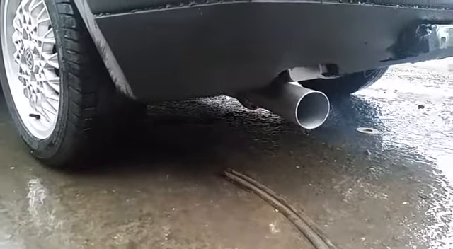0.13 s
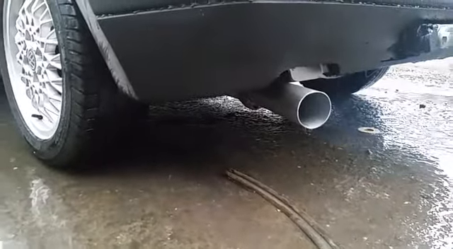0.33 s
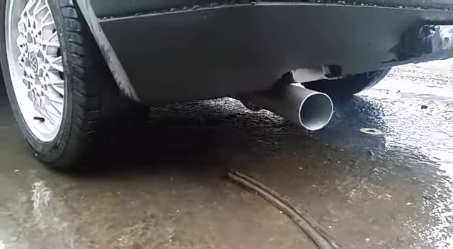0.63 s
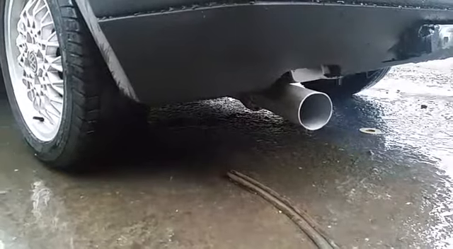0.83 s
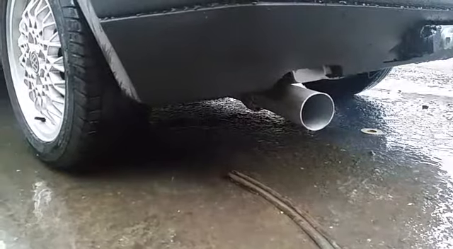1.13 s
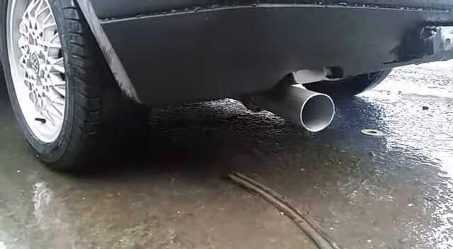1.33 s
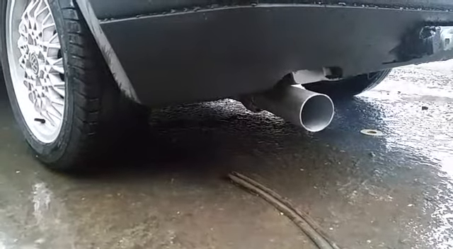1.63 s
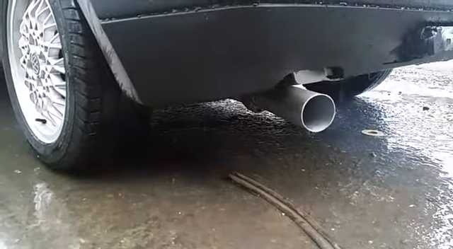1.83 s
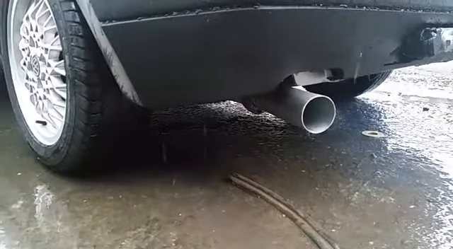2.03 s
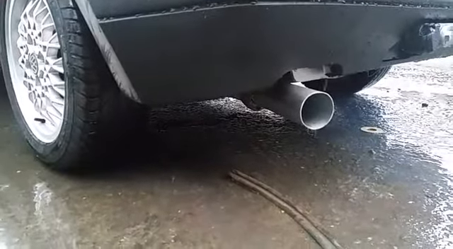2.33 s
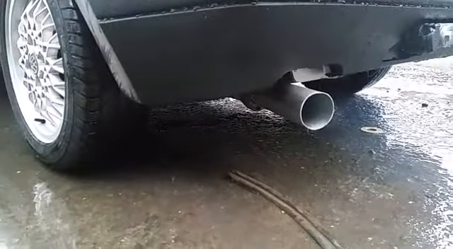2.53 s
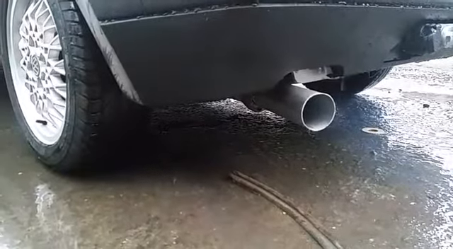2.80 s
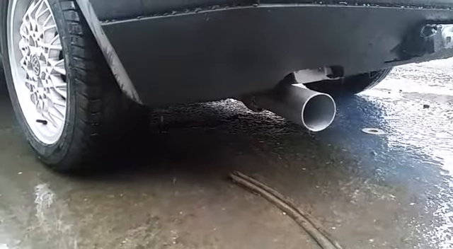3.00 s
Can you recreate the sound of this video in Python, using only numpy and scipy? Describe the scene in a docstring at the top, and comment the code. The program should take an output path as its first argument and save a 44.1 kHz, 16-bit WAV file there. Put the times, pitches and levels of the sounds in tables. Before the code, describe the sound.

A diesel engine at the tailpipe drops to idle, then revs up with growing boom and whistle

```python
"""Four-cylinder turbo diesel at the tailpipe

Heard close up, the engine falls back from a blip, idles, then revs up steadily; a tiny tick falls in the climb.
Each firing booms through the silencer (a sum of harmonics) and pushes out a puff of hissing gas (shaped noise).
The turbo's breathy whistle (a wavering tone and narrow noise) climbs with the revs and flares where it
meets a resonance of the pipe."""
import sys
import numpy as np
from scipy import signal
from scipy.fft import rfft, irfft
from scipy.io import wavfile

SR = 44100
rng = np.random.default_rng(int(sys.argv[2]) if len(sys.argv) > 2 else 0)


def store_pcm(level_fs):
    """Save levels as 16-bit WAV."""
    pcm = np.round(np.clip(level_fs, -1, 1) * 32767).astype(np.int16)
    wavfile.write(sys.argv[1], SR, np.atleast_2d(pcm).T)


N = 139356  # length in samples
TIME = np.arange(N) / SR  # s
BINS = np.arange(N // 2 + 1) * SR / N  # Hz, the frequencies of a whole-length spectrum


def undb(db):
    """Turn decibels into a plain multiplier."""
    return 10 ** (np.asarray(db) / 20)


def curve(table, axis=1):
    """One column of a time table, sample by sample."""
    rows = np.array(table)
    return np.interp(TIME, rows[:, 0], rows[:, axis])


def response(table, hz, axis=1):
    """Gain of a spectrum table at these frequencies, read along a logarithmic pitch scale."""
    rows = np.array(table)
    return undb(np.interp(np.log(np.maximum(hz, 1)), np.log(rows[:, 0]), rows[:, axis]))


def below(hz, edge_hz):
    """Share of a smooth crossover that lies under its edge."""
    return 1 / (1 + (hz / edge_hz) ** 6)


def walk(rate):
    """Smooth chance of spread 1, about this many turns a second."""
    x = irfft(rfft(rng.standard_normal(N)) * np.exp(-.5 * (BINS / rate) ** 2), N)
    return x / x.std()


def boom(hz, firings):
    """Firing pulses as harmonics shaped by the silencer; unequal cylinders add weak lines between them."""
    # how hard the exhaust works: t/s, firing fundamental/dB, relative boom/dB, relative growl/dB
    effort = [(0,-11.5,-1,-5.5),(.12,-19,1.5,-4.5),(.22,-13.5,-1.5,0.5),(.4,-22,-3,-6.5),(.48,-15,-6.5,-9),(.63,-30,-2.5,-15),(.8,-21,-1.5,-21),(.95,-21.5,-2.5,-10.5),(1.25,-16.5,-2,-7.5),(1.6,-18.5,-1.5,-8.5),(1.85,-18,1,-2.5),(2.05,-15,0.5,2),(2.28,-14,-0.5,0.5),(2.5,-12.5,2.5,4),(2.8,-13,2,-0.5),(3.0,-11.5,7,4),(3.16,-10,2.5,4.5)]
    # what the silencer lets through of the lines above the fundamental: f/Hz, level/dB
    silencer = [(20,-29),(42,-28),(65,-16),(80,-17.5),(90,-9.5),(112,-13),(130,-11),(148,-15),(174,-11),(202,-13.5),(214,-23),(228,-30),(250,-46.5),(278,-25),(320,-30),(342,-36.5),(380,-27),(402,-35),(435,-59),(480,-47),(550,-43),(700,-69)]
    growl_edge_hz, growl_lope_db = 200, 9  # the half-firing lines are stronger in the growl
    uneven_db, cycle_db = -20, -30  # lines at half firings and at quarter firings
    delay_s, bass_lead_s = 0.00464, 0.007
    smear_s = 0.001054  # the pipe smears each pulse: 200 Hz comes this much before the bass
    ring_hz, ring_rad = 158, 1.22  # the silencer's main resonance turns the phase, so each pulse rings
    fundamental, middle, growl = (curve(effort, axis=column) for column in range(1, 4))
    phase = 2 * np.pi * (firings - delay_s * hz)
    out = 0
    # four firings make one engine cycle, so the lines stand a quarter apart; higher up, a half
    for quarter in [*range(4, 18), *range(18, 45, 2)]:
        k = quarter / 4
        line = k * hz
        high = np.clip((line - growl_edge_hz) / 40 + .5, 0, 1)  # 0 in the boom, 1 in the growl
        if k == 1:
            size = undb(fundamental)
        else:
            size = response(silencer, line) * undb((1.5 - high) * middle + high * growl)
        if k % 1:
            weak_db = cycle_db if quarter % 2 else uneven_db + growl_lope_db * high
            size = size * undb(weak_db + 2 * walk(2.7))
            lead = rng.uniform(0, 2 * np.pi)
        else:
            bass_lead = 2 * np.pi * line * bass_lead_s * below(line, edge_hz=62)
            smear = np.pi * line * smear_s * line / 200
            lead = bass_lead + smear + ring_rad * (1 - below(line, ring_hz))
        out = out + size * np.cos(k * phase + lead)
    scatter = undb(0.33 * walk(25))  # chance in the strength of the firings
    pan = undb(np.array([[-.5], [.5]]) * 2.28)  # the right side is 2.28 dB louder
    return out * scatter * pan


def puffs(hz, firings):
    """Level in dB of the gas through each firing: a steep front and a slower fall, deepest at idle."""
    swing_db = np.interp(hz, [42.3, 97], [3.4, 1.7])  # from idle to revving, in firings per second
    turn = 2 * np.pi * firings + np.pi / 2
    front = 0.2  # steepness of a puff's front
    shape = sum(front ** (k - 1) * np.sin(k * turn) for k in range(1, 5))
    return swing_db * shape + .8 * walk(41)


def gas(puff_db):
    """Spectrum of the gas that leaves in puffs: an even rumble, then a rush and a hiss that follow the flow."""
    # gas flow: t/s, relative level of the low rush/dB, relative level of the hiss/dB
    flow = [(0.0, -36, -46.5), (0.08, -39, -48.5), (0.14, -39.5, -47.5), (0.21, -37.5, -44.5),
            (0.44, -40, -50.5), (0.87, -38, -51), (0.9, -36, -50.5), (0.94, -39.5, -51.5),
            (1.2, -37.5, -49), (1.55, -38, -48), (2.38, -35, -38), (2.59, -35, -38), (3.09, -30, -34.5),
            (3.14, -31.5, -34)]
    rush_puff_db = 0.2 * puff_db  # rumble and rush take only a share of the swing
    sputter_db = -0.5 * walk(320)
    noise = rng.standard_normal(N)
    rumble = rfft(noise * undb(-1 + rush_puff_db))
    rush = rfft(noise * undb(curve(flow, axis=1) + 38 + rush_puff_db))
    hiss = rfft(noise * undb(curve(flow, axis=2) + 38 + puff_db + sputter_db))
    deep = below(BINS, edge_hz=286)
    low = below(BINS, edge_hz=2640)
    return deep * rumble + (low - deep) * rush + (1 - low) * hiss


def turbo():
    """A whistle and its octave: nearly a tone at idle, breathy at speed."""
    # turbo: t/s, whistle f/Hz, width/Hz, relative whistle level/dB, relative level of its octave/dB
    whistle_table = [(0,2600,90.74,-33,-34),(.25,2510,88.88,-29,-20),(.5,2150,70,-24,-32),(.78,2020,50.13,-25,-38),(.9,1990,25,-19,-38),(1.3,1990,25,-15,-34),(1.6,2030,30.46,-17.5,-34),(1.8,2170,60.4,-14.5,-23),(2.0,2340,80,-16,-16.5),(2.14,2554,80,-25,-31),(2.23,2643,85.9,-28,-10),(2.4,3000,108.7,-20,-7),(2.6,3534,130.3,-14,-15),(2.78,3985,136.8,-6,-3),(2.98,4417,167.6,-3,-28),(3.1,4952,177.7,4.5,-14),(3.16,4970,170,-3,-13)]
    phase = 2 * np.pi * np.cumsum(curve(whistle_table)) / SR
    width = curve(whistle_table, axis=2)
    place = np.cumsum(width) / 400  # chance made at 400 turns a second is read slower for a narrower band

    def flutter(k):
        return np.interp(k * place, np.arange(N), walk(400))

    def band(k):
        """Narrow noise around k times the whistle."""
        return (flutter(k) * np.cos(k * phase) + flutter(k) * np.sin(k * phase)) / np.sqrt(2)

    clean = np.clip(1 - (width / 80) ** 2, 0, 1)  # under 80 Hz width the band turns into a wavering tone
    wavering = np.cos(phase + 0.86 * walk(33))
    whistle = np.sqrt(clean) * wavering + np.sqrt(1 - clean) * band(0.97)
    return undb(curve(whistle_table, axis=3)) * whistle + undb(curve(whistle_table, axis=4)) * band(2)


def tailpipe(hz, firings):
    """The gas rings the pipe and reaches the right microphone first; ground and body scatter a part."""
    # colour of the tailpipe at each microphone: f/Hz, left level/dB, right level/dB
    pipe = [(25,-30,-26),(70,2,-5),(190,-10,-2.5),(324,-15.5,-14.5),(397,-18,-17.5),(460,-22.5,-24.5),(513,-20.5,-21),(745,-30,-26.5),(830,-23,-17.5),(905,-28.5,-35.5),(1052,-31,-20.5),(1264,-40.5,-36.5),(1745,-35.5,-27.5),(1916,-18.5,-18.5),(2242,-29.5,-29),(2760,-41,-36),(3350,-36.5,-31),(3970,-50,-37),(4315,-39,-25),(4765,-30.5,-15),(5280,-26,-13.5),(5600,-39,-24.5),(5930,-49,-21.5),(6480,-20.5,-36),(6660,-66,-24),(7750,-19,-21.5),(8200,-39,-24.5),(9650,-26,-25),(9770,-32,-29.5),(11100,-35.5,-29.5),(12500,-32.5,-40.5),(15500,-60,-40.5)]
    diffuse, right_leads_s = .32, .000075  # scattered share of the gas power; lead in the treble
    puff_db = puffs(hz, firings)
    # the whistle swings with the puffs, 1.7 times as deep in dB and 3.5 ms later
    whistle = turbo() * undb(1.7 * np.interp(TIME - .0035, TIME, puff_db))
    direct = gas(puff_db) * np.sqrt(1 - diffuse) + rfft(whistle)
    lag = right_leads_s * (1 - .5 * below(BINS, edge_hz=2100))  # only half as long in the bass
    late = direct * np.exp(-2j * np.pi * BINS * lag)
    # each side gets scattered gas of its own
    left = (late + np.sqrt(diffuse) * gas(puff_db)) * response(pipe, BINS, axis=1)
    right = (direct + np.sqrt(diffuse) * gas(puff_db)) * response(pipe, BINS, axis=2)
    return irfft(np.array([left, right]), N)


def tick():
    """One small dry tick as the revs rise: a burst of band-limited noise that dies away at once."""
    # the tick: start t/s, level/dB, decay/s, middle f/Hz, width/Hz
    start, db, decay, middle_hz, width = (1.749, -29, .003, 2700, 2600)
    age = TIME - start
    edges = [middle_hz - width / 2, middle_hz + width / 2]
    band = signal.butter(2, edges, "band", fs=SR, output="sos")
    noise = signal.sosfilt(band, rng.standard_normal((2, N)))
    return noise / noise.std() * undb(db) * (age > 0) * np.exp(-np.abs(age) / decay)


def scene():
    """Engine speed drives the boom and the puffs of gas."""
    # engine speed: t/s, firings per second/Hz (before a slight jitter)
    speed = [(0.0, 64.3), (0.1, 59.29), (0.25, 50.96), (0.42, 43.06), (0.52, 39.96), (0.63, 40.71),
             (0.98, 43.74), (1.33, 44.61), (1.59, 46.22), (1.72, 50.21), (1.86, 56.9), (2.01, 64.13),
             (2.21, 72.46), (2.38, 80.82), (2.56, 88.33), (2.79, 97.76), (3.0, 105.38), (3.16, 112.68)]
    hz = curve(speed) * (1 + 0.00057 * walk(16))
    firings = 0.079 + np.cumsum(hz) / SR  # a small share of a firing is already gone at the start
    return boom(hz, firings) + tailpipe(hz, firings) + tick()


def record(dry):
    """The very highest peaks are rounded near full scale, and all above 15.7 kHz is cut."""
    held = dry / (1 + dry ** 10) ** .1
    return signal.sosfilt(signal.ellip(10, .2, 80, 15700, fs=SR, output="sos"), held)


dry = scene()
out = record(dry)
store_pcm(out)
```